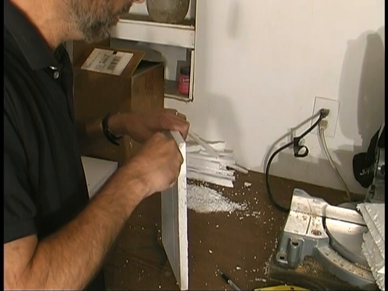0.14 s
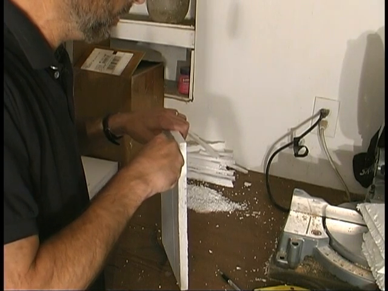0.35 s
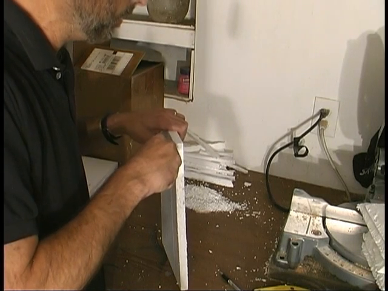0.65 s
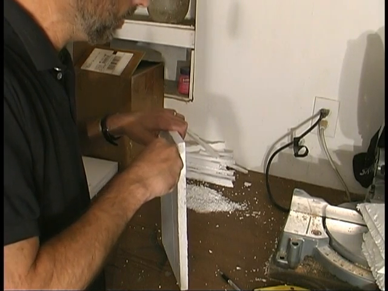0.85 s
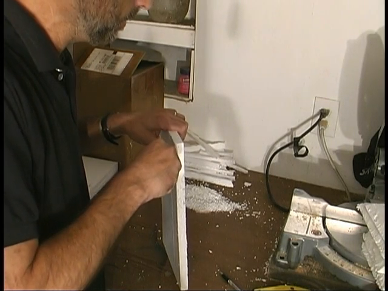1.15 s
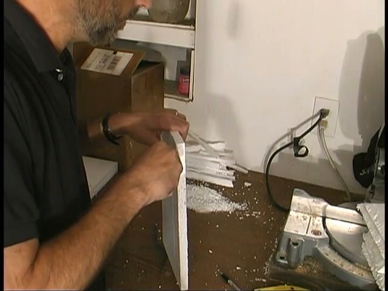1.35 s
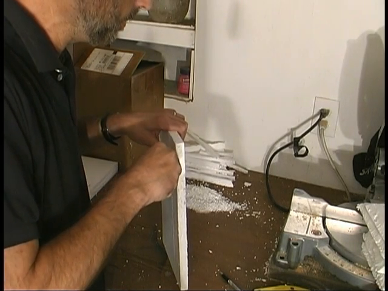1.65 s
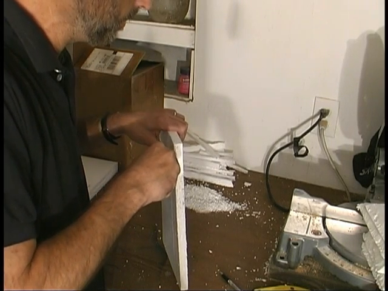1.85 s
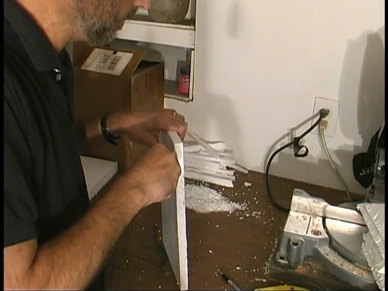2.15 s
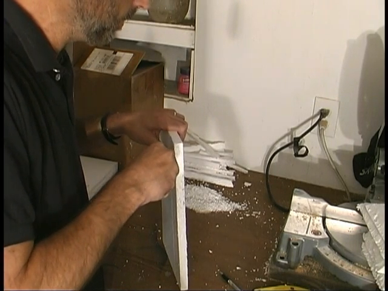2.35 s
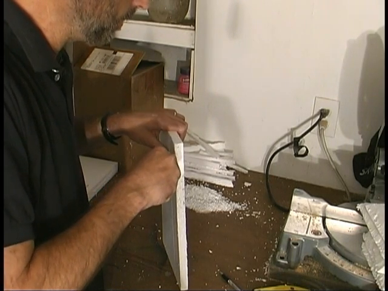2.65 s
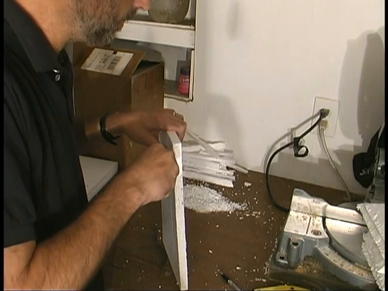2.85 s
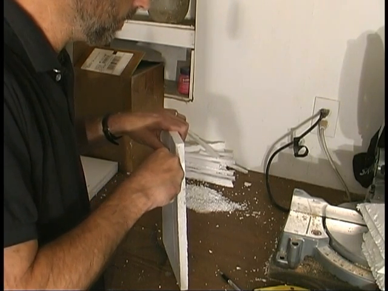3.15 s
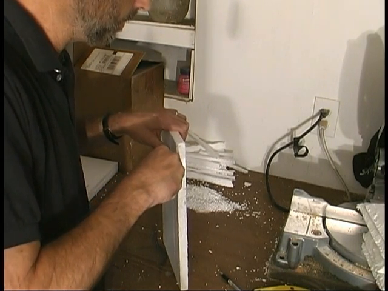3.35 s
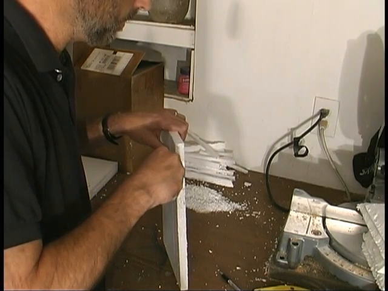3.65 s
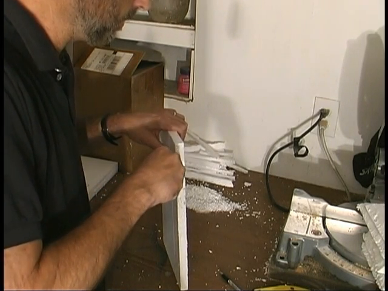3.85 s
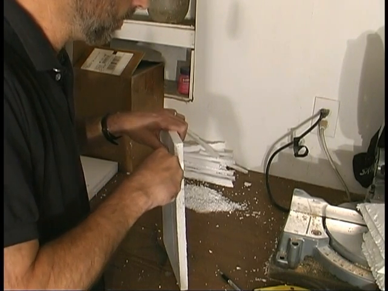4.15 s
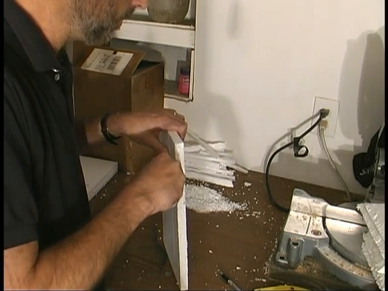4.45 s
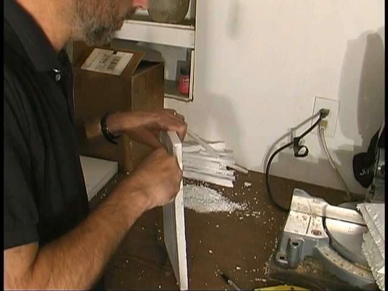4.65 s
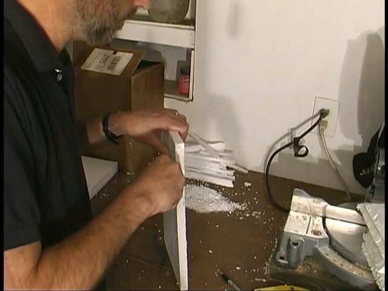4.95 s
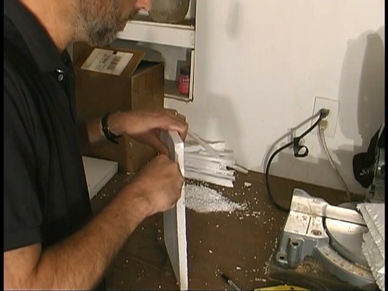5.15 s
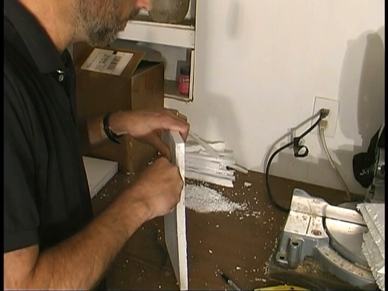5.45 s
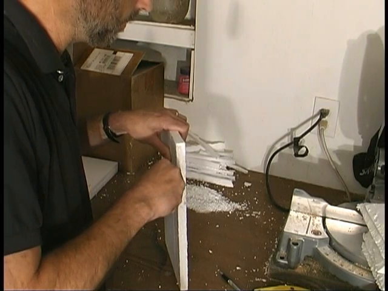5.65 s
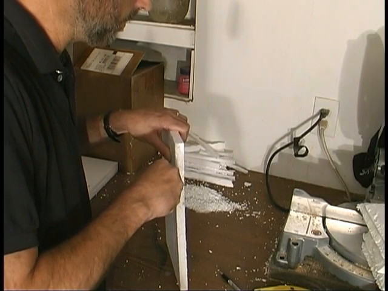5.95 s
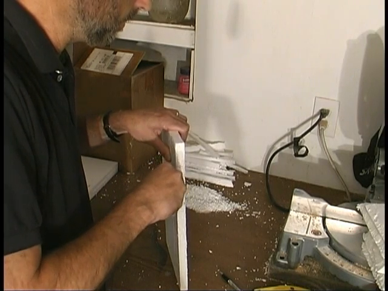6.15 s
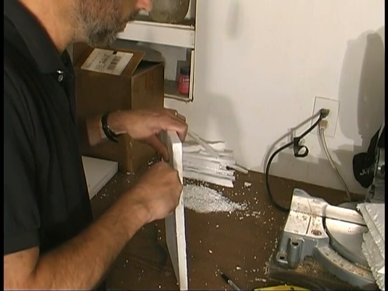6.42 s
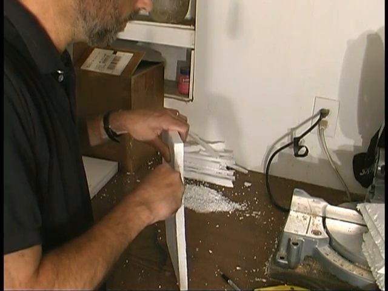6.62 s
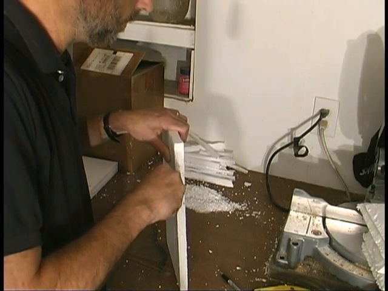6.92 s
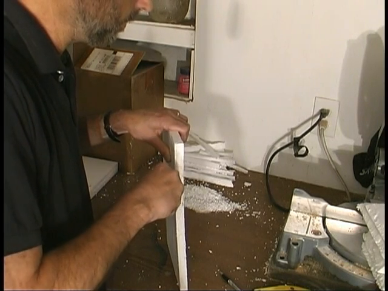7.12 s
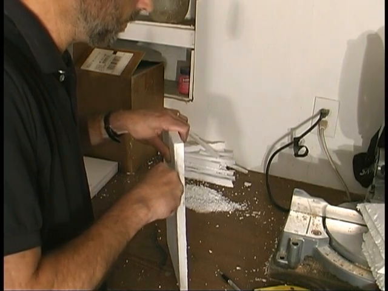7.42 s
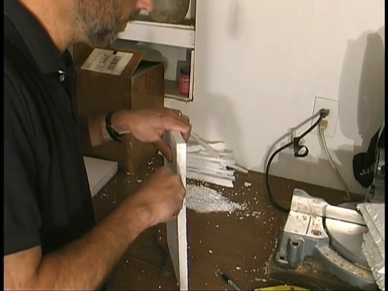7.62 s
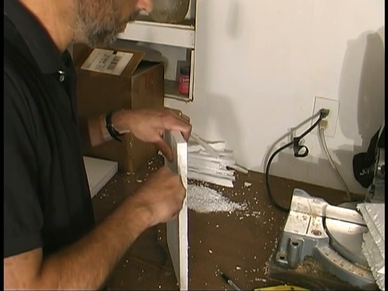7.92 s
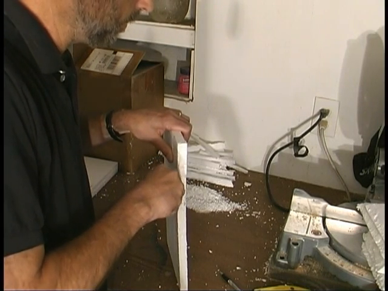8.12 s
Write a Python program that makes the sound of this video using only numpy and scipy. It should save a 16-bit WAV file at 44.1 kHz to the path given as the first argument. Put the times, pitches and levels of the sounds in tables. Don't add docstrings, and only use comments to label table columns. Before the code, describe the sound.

Close stereo sound of a thin blade sawing through a foam bead sheet on a workbench. Short, dry, gritty rasps come four to five a second without a real break, each stopping abruptly. Larger beads snap brightly, and soft low thumps and wooden knocks follow the hand's jerks. A faint mains hum, low rumble and air lie beneath, with a distant motor speeding up early on. The small hard room answers briefly.

```python
import sys
import numpy as np
from scipy import signal
from scipy.fft import rfft, irfft, next_fast_len
from scipy.io import wavfile
from scipy.ndimage import uniform_filter1d, map_coordinates

SR = 44100
rng = np.random.default_rng(int(sys.argv[2]) if len(sys.argv) > 2 else 0)


def transcribe(signal):
    frames = np.atleast_2d(signal).T
    limited = np.clip(frames, -1, 1)
    pcm = np.round(limited * 32767).astype(np.int16)
    wavfile.write(sys.argv[1], SR, pcm)


def volts_from_db(level):
    exponent = np.asarray(level, float) / 20
    return 10 ** exponent


N = 365085

# (start [s], length [s], bite [dB], middle [dB], fizz [dB])
BITING_STROKES = [(0.3, 0.12, -34, -25.5, -10), (0.558, 0.099, -43, -29.5, -29),
                  (0.76, 0.1, -31.5, -28.5, -10), (0.979, 0.1, -27.5, -28, -13), (1.183, 0.1, -33, -31, -5),
                  (1.601, 0.1, -31.5, -28.5, -5), (2.039, 0.11, -32, -30.5, -15),
                  (2.458, 0.14, -33, -27.5, -5), (2.721, 0.13, -47, -30, -23), (3.185, 0.11, -29, -29, -13),
                  (3.395, 0.15, -34, -27.5, -5), (3.846, 0.12, -33.5, -29, -6),
                  (4.518, 0.15, -29.5, -33, -10), (5.41, 0.12, -34, -31, -16),
                  (5.815, 0.12, -35, -29.5, -8), (6.449, 0.1, -31.5, -27, -14),
                  (6.635, 0.15, -35.5, -27.5, -5), (7.063, 0.265, -38.5, -33, -10),
                  (7.411, 0.14, -33.5, -27.5, -11), (7.656, 0.13, -38, -31.5, -2)]
# (start [s], length [s], bite [dB], middle [dB], fizz [dB])
EASING_STROKES = [(0.078, 0.12, -32, -31, -35), (1.388, 0.11, -30, -30, -27),
                  (1.813, 0.11, -32.5, -30.5, -18), (2.249, 0.12, -30.5, -32, 1),
                  (2.942, 0.13, -31.5, -28.5, -9), (3.625, 0.12, -30.5, -30.5, -10),
                  (4.07, 0.15, -32.5, -30, -12.5), (4.287, 0.14, -31, -29, -8),
                  (4.735, 0.15, -31.5, -25, -0.5), (4.978, 0.1, -32, -29.5, -10.5),
                  (5.177, 0.12, -32, -32, -18.5), (5.598, 0.12, -29.5, -29.5, -17),
                  (5.991, 0.18, -35.5, -23.5, -2), (6.247, 0.1, -30, -29.5, -4.5),
                  (6.847, 0.16, -27, -24, -17), (7.834, 0.17, -33, -29, -3),
                  (8.085, 0.17, -36.5, -30, -8.5)]
# (time [s], peak [dB], pitch [Hz], sheet knock [dB])
BEAD_SNAPS = [(0.361, -10.5, 5260, -26), (0.9943, -10, 7000, -4), (1.0444, -17, 5950, -32),
              (1.4886, -18, 6170, -20), (1.6585, -21, 5250, 6.5), (2.532, -3.5, 5940, -12),
              (3.197, -35, 5400, 17.5), (4.35, -10, 5380, -12), (4.4029, -11, 7400, -10),
              (4.539, -20, 5910, -1), (4.809, -9.5, 3900, -11), (4.8281, -14, 5140, 0),
              (4.8695, -7, 6890, -10), (5.4233, -30, 8050, 8), (5.6495, -7.5, 5330, -16),
              (6.095, -8, 5030, -3), (6.1175, -15, 4950, 4), (6.6486, -26.5, 7140, 5),
              (6.8838, -8, 5400, -21), (6.9244, -8, 4850, -15), (6.9437, -20, 7700, 6),
              (7.077, -22, 5220, 0), (7.5012, -10, 5050, -14), (7.9323, -10, 5170, -11),
              (8.0294, -12.5, 7700, -34)]


def unit(x):
    return x / np.sqrt(np.mean(x ** 2) + 1e-20)


def along(points, hz):
    f, v = np.transpose(points)
    return np.interp(np.log(hz + 1), np.log(f + 1), v)


def curves(rows):
    s, *cols = np.transpose(rows)
    return [np.interp(np.arange(N) / SR, s, c) for c in cols]


def wobble(rate_hz):
    knots = rng.standard_normal(int(N * rate_hz / SR) + 4)
    return map_coordinates(knots, [np.arange(N) * rate_hz / SR])


def filtered(x, response):
    m = next_fast_len(N + SR // 2)
    return irfft(rfft(x, m) * response(np.fft.rfftfreq(m, 1 / SR)), m)[..., :N]


def coloured_noise(shape, spectrum):
    return unit(filtered(rng.standard_normal(shape), lambda hz: volts_from_db(along(spectrum, hz))))


def below(hz, edge_hz):
    return 1 / (1 + (hz / edge_hz) ** 6)


def decay(t, t60_s):
    return volts_from_db(-60 * t / t60_s)


def sine(t, hz):
    return np.sin(2 * np.pi * hz * t)


def burst(t, hz, smooth, t60_s):
    flutter = 1 + unit(uniform_filter1d(rng.standard_normal((2, len(t))), size=smooth))
    return flutter * sine(t, hz) * decay(t, t60_s)


def add_at(out, start_s, sound):
    out[..., round(start_s * SR):][..., :sound.shape[-1]] += sound


def ports(pair):
    # (frequency [Hz], left-right likeness)
    likeness = [(60, 0.39), (150, 1), (380, 0.13), (950, 0.86), (2380, 0.97), (5980, 1), (15000, 0.67)]
    # (frequency [Hz], left phase lead [rad])
    lead_rad = [(0, 0.1), (340, -0.83), (600, 1.8), (950, 0.9), (1890, 0.13), (2670, 1), (4050, 0.58),
                (15400, -0.34)]
    # (frequency [Hz], left-right level [dB])
    tilt_db = [(60, -6), (180, -3), (550, 3.5), (1650, -2.5), (4970, -2), (15000, -0.5)]

    def mid_side(hz):
        turn = np.arccos(np.clip(along(likeness, hz), 0, 1)) / 2
        return np.array([np.cos(turn), np.sin(turn)])

    def left_right(hz):
        half = volts_from_db(along(tilt_db, hz) / 2) * np.exp(.5j * along(lead_rad, hz))
        return np.array([half, 1 / half])

    mid, side = filtered(pair, mid_side)
    return filtered(np.array([mid + side, mid - side]), left_right)


def centred(x):
    return x * volts_from_db([[-1.01], [1.01]])


def motor():
    # (time [s], speed [Hz], level [dB])
    run_up = [(0.0, 38.2, -63), (0.5, 37.9, -59), (1.04, 42.2, -51), (1.56, 46.4, -50.5), (2.08, 52.5, -48),
              (2.3, 54.3, -61), (2.7, 56, -80)]
    speed_hz, level_db = curves(run_up)
    return np.sqrt(2) * volts_from_db(level_db) * np.sin(2 * np.pi * np.cumsum(speed_hz) / SR)


def basement():
    # (frequency [Hz], density [dB per Hz])
    rumble_spectrum = [(18, -30), (26, -12), (36, -4), (46, 13), (54, 7), (66, -48)]
    # (frequency [Hz], density [dB per Hz])
    air_spectrum = [(40, -24), (70, -2), (140, -3), (280, -11.5), (700, -15), (2000, -15.5), (6000, -16),
                    (10000, -21), (15000, -29)]
    hum_hz, hum_db, rumble_db = 59, -53, -60.5
    hum_level_db = hum_db + 0.1 * wobble(2.55) + 3.3 * wobble(5.5)
    hum_phase = 2 * np.pi * hum_hz * np.arange(N) / SR + 0.37 * wobble(3.7)
    hum = np.sqrt(2) * volts_from_db(hum_level_db) * np.sin(hum_phase)
    rumble_level_db = rumble_db + 1.5 * wobble(2.5) + 4
    rumble = volts_from_db(rumble_level_db) * coloured_noise(N, rumble_spectrum)
    air = coloured_noise((2, N), air_spectrum)
    return centred(hum + motor() + rumble) + volts_from_db(-52.0) * ports(air)


def pressure(stop_db_per_s=500, hang_db=-5):
    bite_rise_s, ease_rise_s, end_db = 0.02, 0.046, -33.5
    t = np.arange(N) / SR
    out = volts_from_db(-44 - 253 * t)
    for rise_s, strokes in ((bite_rise_s, BITING_STROKES), (ease_rise_s, EASING_STROKES)):
        for start_s, length_s, bite_db, middle_db, _ in strokes:
            first = round(start_s * SR)
            span = slice(first, first + SR // 2)
            age = t[span] - start_s
            knots_s = [rise_s, (rise_s + length_s) / 2, length_s]
            level_db = np.interp(age, knots_s, [bite_db, middle_db, end_db])
            stop_db = stop_db_per_s * np.clip(age - length_s, 0, 1)
            out[span] += np.clip(age / rise_s, 0, 1) * volts_from_db(level_db - stop_db)
    for snap_s, *_ in BEAD_SNAPS:
        first = round(snap_s * SR)
        span = slice(first - SR // 50, first)
        out[span] *= volts_from_db(hang_db * np.exp((t[span] - snap_s) / 0.01))
    return out


def flex():
    flex_db, settle_s = -23, 0.048
    age = np.arange(SR // 4) / SR
    out = np.zeros(N)
    for start_s, _, bite_db, middle_db, _ in BITING_STROKES:
        level_db = flex_db + 0.83 * (bite_db - middle_db)
        out[round(start_s * SR):][:SR // 4] = volts_from_db(level_db) * np.exp(-age / settle_s)
    return out


def patchy(x, depth_db):
    # (time [s], pitch [Hz], gain [dB])
    sings = [(0.36, 4260, 6), (0.15, 2050, -10), (0.36, 1700, 5), (2.09, 2150, 6.5), (0.82, 4400, 4),
             (1.24, 2220, 3), (1.44, 1640, 4), (1.04, 2100, -5), (1.65, 7350, 4), (1.87, 7040, 5),
             (2.09, 7060, 7.5), (2.32, 6290, 5.5), (2.32, 2530, 4.5), (2.53, 6330, 6), (2.79, 2230, 6),
             (2.79, 6100, 6), (3.91, 7840, 1), (4.6, 1490, 4), (4.82, 1210, 7), (5.47, 1410, 10),
             (5.49, 3240, 6), (5.47, 5300, 1), (5.66, 4720, 5.5), (5.88, 3300, 6), (6.08, 5000, 4),
             (6.31, 3040, 5), (7.2, 1890, 5.5), (7.71, 1820, 4), (7.73, 2410, 7), (8.17, 1740, 3)]
    width_share, half_length_s = 0.062, 0.15
    hz, t, z = signal.stft(x, SR, nperseg=512)
    field = uniform_filter1d(rng.standard_normal(z.shape[-2:]), size=3, axis=0)
    field = uniform_filter1d(field, size=16, axis=1)
    gain_db = depth_db * unit(field)
    for s, pitch_hz, sing_db in sings:
        band = np.exp(-((hz / pitch_hz - 1) / width_share) ** 2)
        spell = np.exp(-((t - s) / half_length_s) ** 4)
        gain_db = gain_db + sing_db * np.outer(band, spell)
    return signal.istft(z * volts_from_db(gain_db), nperseg=512)[1][..., :N]


def rings(hz, modes, gain):
    peaks = sum(volts_from_db(db) * w * w / (w * w + 4 * (hz - c) ** 2) for c, w, db in modes)
    return 1 + gain * peaks


def rasp():
    # (frequency [Hz], density [dB per Hz])
    tear_spectrum = [(440, -35.5), (750, -31), (950, -9.5), (1550, -9.5), (1970, -2.5), (2320, -5.5),
                     (3260, -5), (4460, -5), (5190, -2), (6590, -5.5), (7660, -4), (10800, -10.5),
                     (13700, -8.5), (15200, -12)]
    # (frequency [Hz], width [Hz], level [dB])
    sheet_modes = [(357, 21, -3), (653, 61, -0.5), (957, 16, -3.5), (1105, 9.9, 6), (1261, 14, -1),
                   (1688, 7.6, 3), (2058, 116, -0.4), (2648, 44, -8)]
    # (frequency [Hz], width [Hz], level [dB])
    blade_modes = [(3300, 54, -3), (5260, 160, -9), (5970, 47, 4), (7540, 37, 9.5)]
    # (frequency [Hz], density [dB per Hz])
    bench_spectrum = [(120, -13.5), (200, 2), (289, -9.5), (345, -2.5), (431, -0.5), (781, -8), (850, -3),
                      (1100, -24), (1870, -120)]
    strokes = BITING_STROKES + EASING_STROKES
    fizz_db, = curves(sorted((s + length / 2, db) for s, length, _, _, db in strokes))
    sheet_db = -7.5 + 0.076 * fizz_db + 0.05 * (np.arange(N) - N / 2) / SR
    bench_db = -24

    clumps = volts_from_db(3.0 * rng.standard_normal(N) + 0.3 * wobble(500) + 1.07 * wobble(60))
    beads = patchy(clumps * rng.standard_normal((2, N)), depth_db=2.48)

    def body(hz):
        modes = rings(hz, sheet_modes, gain=0.98) * rings(hz, blade_modes, gain=0.45)
        return volts_from_db(along(tear_spectrum, hz)) * modes

    def part(share):
        return unit(filtered(beads, lambda hz: body(hz) * np.sqrt(np.abs(share(hz)))))

    def bench_top(hz):
        return volts_from_db(along(bench_spectrum, hz)) * rings(hz, sheet_modes, gain=1.93)

    bench = unit(filtered(beads, bench_top))
    sheet = part(lambda hz: below(hz, 2280))
    edge = part(lambda hz: below(hz, 10170) - below(hz, 3180))
    fizz = part(lambda hz: 1 - below(hz, 9900))
    low = part(lambda hz: below(hz, 1450))
    sway = volts_from_db(0.89 * wobble(25))
    mix = edge + volts_from_db(fizz_db - 4.5) * fizz
    mix = mix + sway * (volts_from_db(sheet_db - 3.0) * sheet + volts_from_db(bench_db - 0.5) * bench)
    return (mix + flex() * (low + 0.22 * bench)) * pressure()


def bench_shake():
    # (frequency [Hz], density [dB per Hz])
    shake_spectrum = [(45, -32), (65, 7), (100, -8), (160, -9.5), (260, -40)]
    push = uniform_filter1d(pressure(), size=1500)
    return volts_from_db(-25.5) * push * coloured_noise(N, shake_spectrum)


def snaps():
    out, t = np.zeros((2, N + SR)), np.arange(SR // 20) / SR
    for s, db, hz, sheet_db in BEAD_SNAPS:
        crack = 0.81 * np.diff(rng.standard_normal((2, len(t))) * decay(t, 0.02), prepend=0)
        sheet = 0.62 * burst(t, 1943, 40, t60_s=0.052) + 0.27 * burst(t, 1250, 30, t60_s=0.07)
        knock = volts_from_db(sheet_db + 7) * (1 - np.exp(-t / 0.0042)) * sheet
        add_at(out, s, volts_from_db(db - 13.5) * (crack + burst(t, hz, 8, t60_s=0.044) + knock))
    return out[:, :N]


def knocks():
    # (time [s], peak [dB], pitch [Hz])
    foot_knocks = [(0.365, -45.5, 343), (0.828, -50, 352), (0.996, -38.5, 340), (1.259, -50, 413),
                   (1.467, -49, 179), (2.535, -41, 348), (3.197, -37, 342), (4.536, -36.5, 334),
                   (4.813, -46, 183), (5.422, -41.5, 300), (5.65, -45.5, 199), (5.833, -43.5, 254),
                   (6.084, -47, 385), (6.652, -43, 243), (7.088, -42, 210), (7.93, -45, 218),
                   (8.114, -44, 220)]
    out, t = np.zeros(N + SR), np.arange(SR // 3) / SR
    for s, db, hz in foot_knocks:
        envelope = decay(t, 0.066) * (1 - np.exp(-t / 0.0044))
        tone = sine(t, hz) + 0.38 * burst(t, hz * 1.58, 120, t60_s=0.2)[0]
        add_at(out, s, volts_from_db(db + 3.0) * envelope * tone)
    return out[:N]


def thumps():
    # (time [s], peak [dB], pitch [Hz])
    bench_thumps = [(0.996, -34.5, 78.5), (1.218, -44, 67.4), (1.645, -42, 84), (2.085, -43, 91),
                    (2.549, -38, 89), (2.8, -43, 83.5), (3.003, -43, 71), (3.201, -36.5, 89),
                    (3.499, -38, 88), (3.928, -35, 88), (4.363, -33, 80), (4.531, -42, 86.6),
                    (4.805, -35, 109.4), (5.026, -52, 69), (5.424, -41, 87), (5.657, -36.5, 87),
                    (5.83, -42, 89), (6.094, -48.5, 199), (6.095, -36, 87.6), (6.483, -38.5, 93),
                    (6.904, -36, 78.5), (7.079, -39.5, 85.5), (7.481, -36, 71), (7.937, -35.5, 92)]
    out, t = np.zeros(N + SR), np.arange(SR // 3) / SR
    for s, db, hz in bench_thumps:
        boom = sine(t, hz) * decay(t, 0.3)
        top = 0.29 * sine(t, hz * 1.58) * decay(t, 0.31)
        add_at(out, s, volts_from_db(db - 1.5) * (1 - np.exp(-t / 0.0037)) * (boom + top))
    return out[:N]


def ticks():
    # (time [s], peak [dB], pitch [Hz])
    crumb_ticks = [(6.5715, -15.5, 10500), (7.093, -24, 10000), (7.104, -31, 7000), (8.022, -16, 8400),
                   (8.104, -26, 9300), (5.28, -20, 9000)]
    out, t = np.zeros((2, N + SR)), np.arange(SR // 20) / SR
    for s, db, hz in crumb_ticks:
        add_at(out, s, volts_from_db(db - 10.0) * burst(t, hz, 4, t60_s=0.007))
    return out[:, :N]


def squeaks():
    # (time [s], peak [dB], pitch [Hz])
    blade_slips = [(6.5814, -31, 6150), (6.591, -27, 6370), (6.602, -28, 6500), (6.609, -31, 6340),
                   (6.613, -30, 6140), (6.618, -35, 6340)]
    out, t = np.zeros((2, N + SR)), np.arange(SR // 20) / SR
    for s, db, hz in blade_slips:
        tone = sine(t, hz) + 0.45 * burst(t, hz * 1.3, 30, t60_s=0.012)
        add_at(out, s, volts_from_db(db) * decay(t, 0.027) * tone)
    return out[:, :N]


def walls(x):
    # (frequency [Hz], t60 [s])
    room_t60 = [(150, 0.68), (1000, 0.36), (4000, 0.26), (12000, 0.17)]
    hz, t, z = signal.stft(rng.standard_normal((2, SR // 2)), SR, nperseg=256)
    tail = signal.istft(z * decay(t, along(room_t60, hz)[:, None]), SR, nperseg=256)[1]
    late = np.pad(x, ((0, 0), (200, 0)))
    return signal.fftconvolve(late, tail / np.linalg.norm(tail[0]), axes=1)[:, :N]


def scene():
    clicks = filtered(snaps() + ticks() + squeaks(), lambda hz: below(hz, 16000) - below(hz, 650))
    pan_db = -1.44 - 0.09 * np.arange(N) / SR + 2.26
    knife = ports(rasp() + clicks) * volts_from_db(np.array([pan_db, -pan_db]) / 2)
    bench = thumps() + knocks() + bench_shake()
    return knife + volts_from_db(-6.5) * walls(knife) + centred(bench) + basement()


def top_cut(x):
    return signal.sosfilt(signal.butter(12, 15870, fs=SR, output="sos"), x)


def record(dry):
    # (band edge [Hz], threshold [dB])
    top_bands = [(12900, -90.5), (13600, -83), (14300, -69)]
    top_hz = 15050
    hz, _, z = signal.stft(dry, SR, nperseg=2048)
    for edge_hz, least_db in top_bands:
        near = (hz > edge_hz) & (hz < edge_hz + 700)
        level = np.sqrt(np.mean(np.abs(z[:, near]) ** 2, axis=(0, 1)))
        z = z * np.where(hz[:, None] > edge_hz, level > volts_from_db(least_db), 1)
    kept = signal.istft(z * (hz < top_hz)[:, None], SR, nperseg=2048)[1][:, :N]
    return top_cut(kept)


dry = scene()
out = record(dry)
transcribe(out)
```